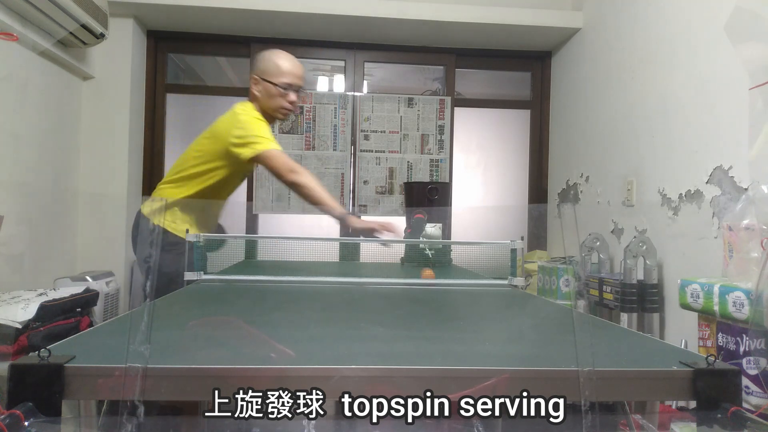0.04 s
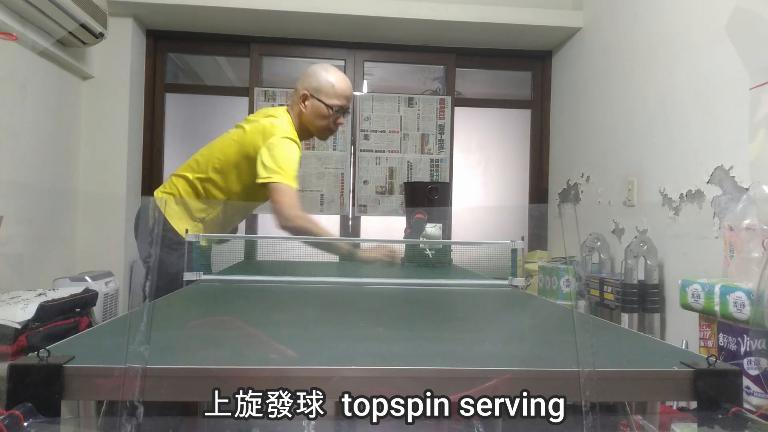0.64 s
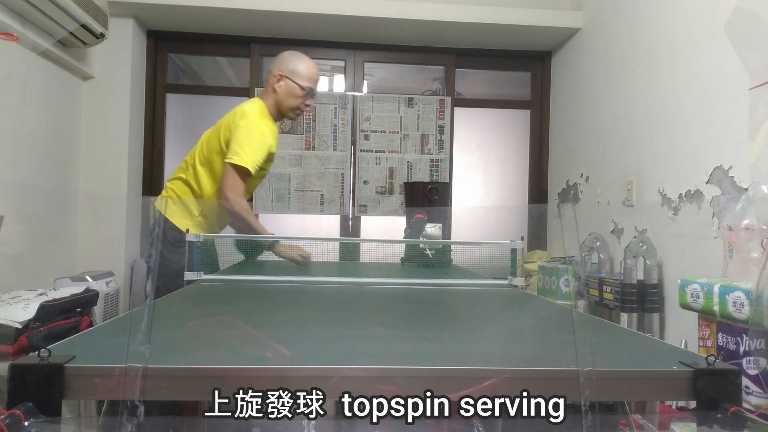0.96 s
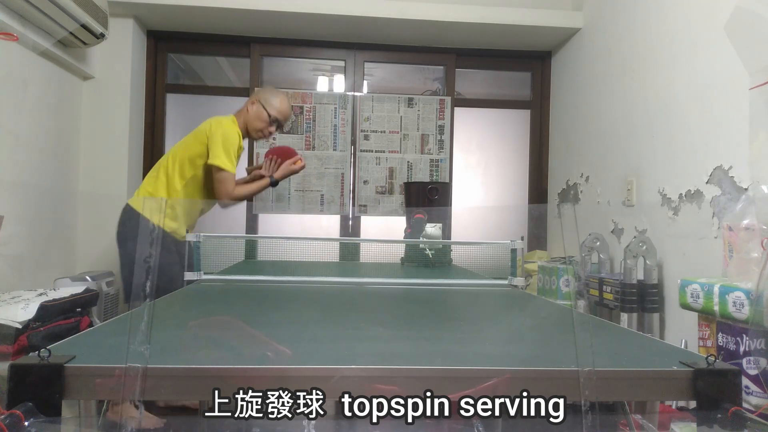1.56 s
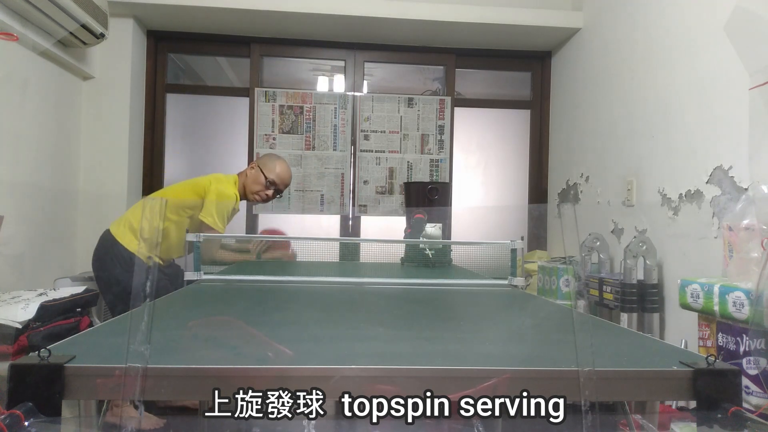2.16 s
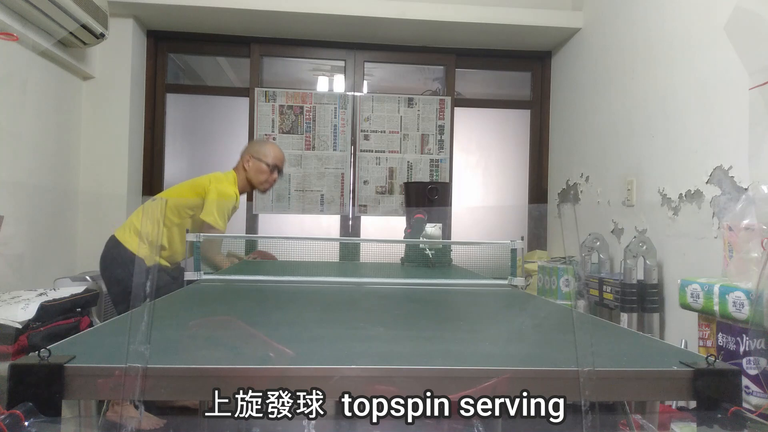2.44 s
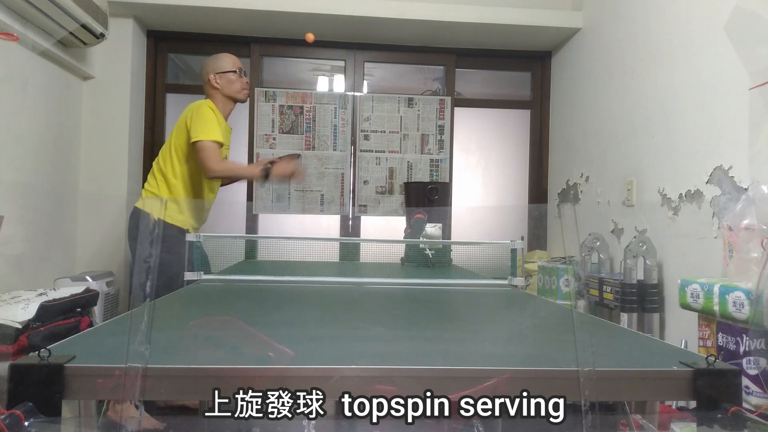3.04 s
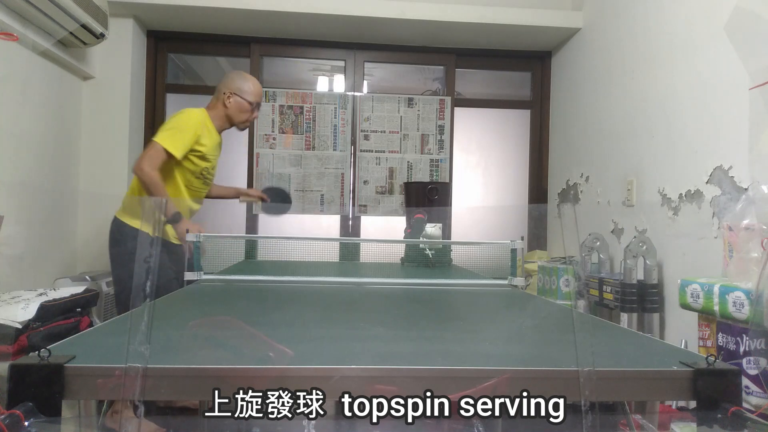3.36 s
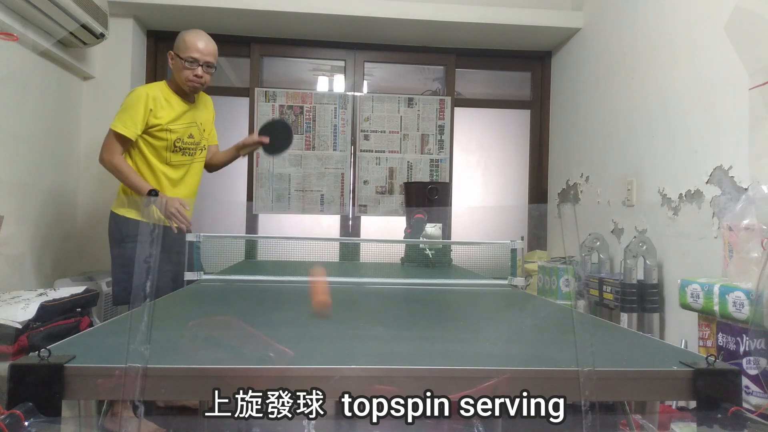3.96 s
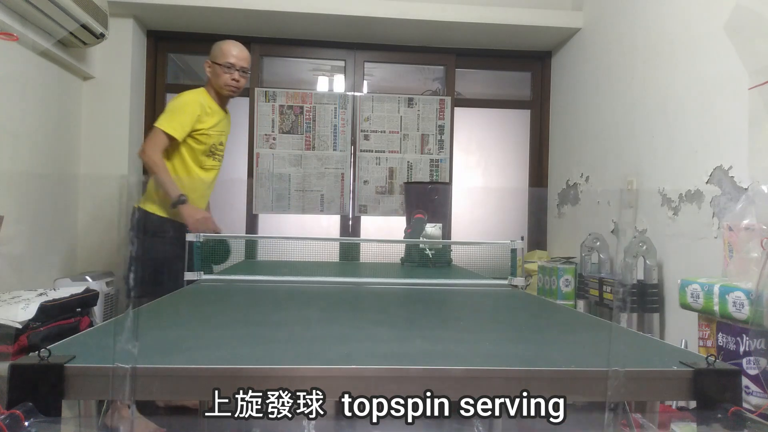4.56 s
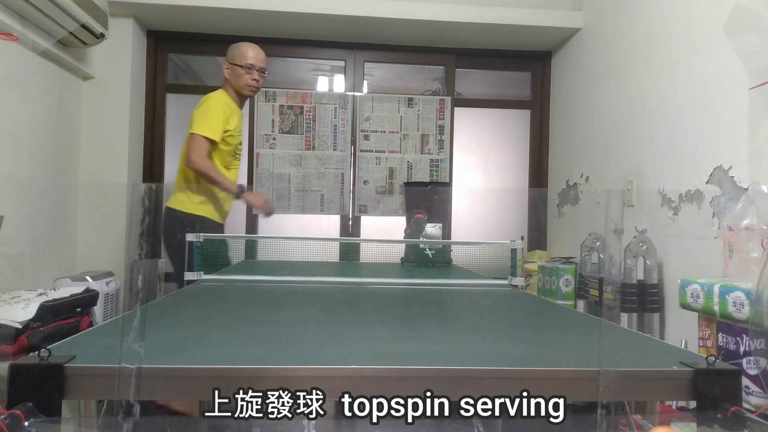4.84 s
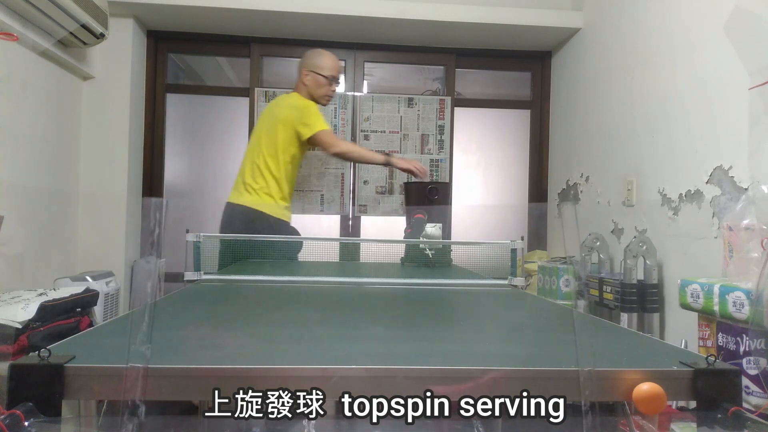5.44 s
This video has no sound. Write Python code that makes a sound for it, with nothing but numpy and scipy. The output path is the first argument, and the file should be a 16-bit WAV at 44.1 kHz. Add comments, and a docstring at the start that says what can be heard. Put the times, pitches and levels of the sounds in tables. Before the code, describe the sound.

Light table tennis bounces indoors, then a foot thud, a paddle hit, two bounces and a close, ringing slap on plastic.

```python
"""Table tennis serve practice

In a small, hard-walled room a ball clicks on the far half of the table and is gathered up. The player
wipes the paddle, tosses, stamps and serves: a hollow pock, two bounces, then a close slap on a plastic
screen that rings on. The ball rolls away with a murmur and taps the table's rim."""
import sys
import numpy as np
from scipy import signal
from scipy.fft import rfft, irfft, next_fast_len
from scipy.io import wavfile
from scipy.ndimage import map_coordinates

SR = 44100
rng = np.random.default_rng(int(sys.argv[2]) if len(sys.argv) > 2 else 0)


def wrap_up_sound(samples):
    """Save the sound to the file named by the first command line argument, as 16-bit audio."""
    columns = np.atleast_2d(samples).T
    # keep every value between -1 and 1, then stretch to whole-number steps
    tamed = np.clip(columns, -1, 1)
    steps = np.round(tamed * 32767).astype(np.int16)
    wavfile.write(sys.argv[1], SR, steps)


N = 246959
AGE = np.arange(SR) / SR  # seconds since a hit
TIME = np.arange(N) / SR  # seconds into the scene

# Ball on table. Each row: start in seconds, then level, shell ring and centre drumming in dB.
BOUNCES = [(-.06, -34, -12, -19), (0.123, -36.5, -22, -40), (0.2699, -38, -20.5, -24),
           (0.3713, -34.5, -19.5, -25), (0.9261, -37.5, -18, -24), (3.6298, -25.5, -13.5, -19.5),
           (4.0159, -27.5, -22, -25)]
# Hand, sole and ball clicks. Each row: start in seconds, level in dB, brightness in dB per octave.
LIGHT_CLICKS = [(1.124, -59.5, 2), (1.199, -64.5, 7), (1.555, -69, -5), (2.918, -65.5, 0),
                (3.154, -54, -3.5), (4.721, -64, 5.5), (5.236, -62.5, 1.5)]
# Hand and cloth. Each row: start in seconds, level in dB, swell in seconds, fade in dB per second.
RUBS = [(1.19, -55.5, 0.069, 115), (1.52, -65.5, .06, 49), (4.4, -66.5, 0.14, 25)]
# Feet on the floor, ball on the screen. Each row: start in seconds, level in dB.
FOOTSTEPS = [(1.2, -46), (2.311, -66), (3.16, -43.5)]
SCREEN_SLAPS = [(4.2611, -26)]
# Ball on paddle and on rim. Each row: start in seconds, level in dB, shell ring in dB.
PADDLE_STROKES = [(3.533, -33, -17)]
RIM_TAPS = [(5.378, -45, -30)]
# The rolling ball's fader ride. Each row: time in seconds, relative level in dB.
ROLL_FADER = [(4.46, -48.5), (4.594, -54.5), (4.602, -50), (4.804, -68), (5.076, -78.5), (5.138, -70),
              (5.16, -83), (5.248, -56.5), (5.36, -70)]

# Tone colours of the noises and struck bodies. Each row: frequency in Hz, relative level in dB.
ROOM_TONE_EQ = [(15, -33), (25, -9), (59, -4.5), (144, -10.5), (164, -15.5), (281, -16.5), (368, -20.5),
                (703, -22), (762, -24), (1080, -24.5), (1530, -28), (1660, -26), (7700, -41.5),
                (12200, -47), (15500, -61.5)]
TABLE_EQ = [(35, -22.5), (70, -4.5), (110, -12), (150, -2), (500, -2.5), (900, 2), (1600, 3), (2200, 7),
            (3000, 8), (4600, 15), (6300, 15), (8200, 17), (9200, 15.5), (11000, 20.5), (15500, 9.5)]
CLICK_EQ = [(100, 1.5), (600, 2), (1300, 2.5), (2500, 0), (4500, -2), (7200, -1), (9500, -19.5),
            (15000, -25.5)]
RUB_EQ = [(710, -43), (1200, -13), (2710, -0.5), (3070, -3.5), (3530, 1), (4890, -2.5), (6650, -1),
          (12500, -31.5), (15000, -35)]
FLOOR_EQ = [(25, -24), (45, -1.5), (62, 6), (110, -21.5), (170, -3.5), (300, -16), (700, -60), (3000, -77)]
PADDLE_EQ = [(60, -54), (400, -19.5), (520, -7), (780, -6), (1080, -2.5), (1450, -6), (1850, -8.5),
             (2500, -20), (3300, -17), (4200, -29), (6200, -24), (8000, -23), (10500, -32), (15500, -39)]
SCREEN_EQ = [(29, -47), (50, -18), (100, -7), (134, -20), (211, -0.5), (256, -4), (513, 0.5), (701, -1),
             (1340, 0), (1440, -11), (1620, 3), (2020, -4), (2170, -6), (6690, -19), (15500, -62.5)]
ROLL_EQ = [(100, -2), (300, -8), (560, -1), (800, -8), (1300, -10.5), (2500, -27.5), (6000, -41),
           (15000, -49)]
RIM_EQ = [(88, -45), (150, -9), (275, -11), (588, -2), (812, -5.5), (982, -7), (1080, -8), (1360, -4.5),
          (1460, -14.5), (2310, -13.5), (2690, -19.5), (6550, -26), (14000, -50)]

# What rings after a hit. Each row: pitch in Hz, relative level in dB, seconds to fade by 60 dB.
BALL_SHELL_MODES = [(8515, -8, 0.025), (10150, -12.5, 0.0073), (10730, -24, 0.0054)]
TABLETOP_MODES = [(140.6, -3, 0.85), (218.1, -2, 0.34), (270, -3, 0.62), (391, -1, 0.16), (502, 5.5, 0.32),
                  (620, -5, 0.6), (890, -4, 0.29)]
TABLETOP_LOWEST_MODE = [(90, 0, 1.0)]
HOLLOW_CLICK_MODES = [(1232, -2, 0.027), (1833, -11, 0.055), (2420, -10, 0.058)]
ROOM_BASS_MODES = [(59.7, 6.5, 0.23), (82.7, -7, 0.71), (139.1, -7, 0.66)]
BLADE_MODES = [(570, 6, 0.097), (1075, -5, 0.046), (1250, -3, 0.054), (3200, -9.5, 0.031)]
SCREEN_MODES = [(134, -13, 0.72), (512, -13, 0.91), (617, -5.5, 0.67), (668, -5.5, 0.81), (695, -2, 0.63),
                (856, -16.5, 0.64), (943, -7.5, 0.77), (1020, -13, 0.93), (1174, -16.5, 0.32),
                (1420, -10.5, 0.81), (1421, -8.5, 0.5), (1550, -2.5, 0.62), (1610, -14.5, 0.78),
                (1690, -1, 0.42), (1750, -6.5, 0.49), (1911, -19, 0.32), (2170, -25.5, 0.72),
                (2520, -10, 0.8), (2767, -20, 0.51), (2966, -24.5, 0.8)]
RAIL_MODES = [(575, -15, 0.57), (988, -8.5, 0.6), (1236, -10, 0.37), (1376, 0, 0.5), (1775, -8, 0.5),
              (1920, -11, 0.59), (2340, -7.5, 0.42), (3042, -11, 0.38)]

# The room's reverb. Each row: frequency in Hz, seconds to fade by 60 dB.
REVERB_TIMES = [(60, 0.72), (150, 0.48), (400, 0.41), (1000, 0.51), (2000, 0.55), (5000, 0.53),
                (8500, 0.49), (11000, 0.45), (15000, 0.2)]


def amp(db):
    """Decibels to gain."""
    return 10 ** (np.asarray(db) / 20)


def unit_energy(x):
    """Scale to energy 1."""
    return x / (np.linalg.norm(x) + 1e-20)


def curve_at(points, hz):
    """Read (Hz, value) points on a log frequency axis."""
    knots_hz, values = np.transpose(points)
    return np.interp(np.log(hz + 1), np.log(knots_hz), values)


def wobble(knots_per_s):
    """A smooth random drift."""
    knots = rng.standard_normal(int(N * knots_per_s / SR) + 4)
    return map_coordinates(knots, [TIME * knots_per_s])


def noise(eq):
    """Coloured noise of rms 1."""
    size = next_fast_len(N)
    gain = amp(curve_at(eq, np.fft.rfftfreq(size, 1 / SR)))
    coloured = irfft(rfft(rng.standard_normal(size)) * gain, size)[:N]
    return coloured / np.sqrt(np.mean(coloured ** 2))


def body(eq, tilt_db=0):
    """A body's dry knock: an impulse shaped by its EQ, the treble tilted by tilt_db per octave."""
    hz = np.fft.rfftfreq(SR, 1 / SR)
    gain = amp(curve_at(eq, hz) + tilt_db * np.log2(1 + hz / 1000))
    cepstrum = irfft(np.log(gain), SR)
    cepstrum[1:SR // 2] *= 2  # minimum phase packs the energy into the attack
    cepstrum[SR // 2 + 1:] = 0
    return unit_energy(irfft(np.exp(rfft(cepstrum)), SR))


def ring(modes, scatter_db=1.0):
    """Damped modes, their balance scattered from hit to hit."""
    out = np.zeros(SR)
    for hz, db, t60 in modes:
        gain = amp(db + scatter_db * rng.standard_normal())
        out += gain * amp(-60 * AGE / t60) * np.sin(2 * np.pi * hz * AGE)
    return unit_energy(out)


def bloom(rise_s):
    """A soft attack that eases up to full level."""
    return 1 - np.exp(-AGE / rise_s)


def in_room(source, direct_db):
    """Direct sound, direct_db against the reverb, then wall echoes that thicken into a diffuse tail."""
    hz, age, spectrum = signal.stft(rng.standard_normal(SR), SR, nperseg=256)
    decay = amp(-60 * age / curve_at(REVERB_TIMES, hz)[:, None])
    tail = signal.istft(spectrum * decay, SR, nperseg=256)[1][:SR]
    density = np.clip((AGE / 0.025) ** 2, 0.08, 1)
    echoes = rng.random(SR) < density
    response = tail * echoes / np.sqrt(density) * bloom(0.002)
    response[0] = amp(direct_db) * np.linalg.norm(response)
    return signal.fftconvolve(source, response)[:SR]


def add(track, start_s, sound):
    """Mix a sound in at its cue."""
    start = round(start_s * SR)
    part = sound[max(-start, 0):N - start]
    track[max(start, 0):][:len(part)] += part


def room_tone():
    """A faint, wavering bed of hush."""
    return amp(-67 + 0.85 * wobble(28)) * noise(ROOM_TONE_EQ)


def table_bounces():
    """Each contact is a lossy half-sine push, shorter and brighter when harder; shell and top ring on."""
    gentle_db, gentle_contact_ms, gentle_tilt_db = -34, 0.652, 0.49
    shortening, brightening = 0.075, 0.054
    out = np.zeros(N)
    for start_s, db, shell_db, drum_db in BOUNCES:
        harder_db = db - gentle_db
        contact_ms = gentle_contact_ms * amp(-shortening * harder_db)
        progress = np.minimum(AGE * 1000 / contact_ms, 1)
        push = np.sin(np.pi * progress) * np.exp(-0.7 * progress)
        table = body(TABLE_EQ, gentle_tilt_db + brightening * harder_db)
        knock = unit_energy(signal.fftconvolve(push, table)[:SR])
        click = knock - amp(shell_db) * ring(BALL_SHELL_MODES)
        tabletop = amp(-14.5) * ring(TABLETOP_MODES)
        drum = amp(drum_db) * ring(TABLETOP_LOWEST_MODE)  # driven by hits near the middle
        board = amp(38) * (tabletop + drum) * bloom(0.032)
        add(out, start_s, amp(db) * (in_room(click, direct_db=-18.5) + board))
    return out


def light_clicks():
    """Hand, sole and ball make small ticks with a hollow ring."""
    out = np.zeros(N)
    for start_s, db, tilt_db in LIGHT_CLICKS:
        tick = in_room(body(CLICK_EQ, tilt_db), direct_db=-13.5)
        hollow = amp(-7.5) * in_room(ring(HOLLOW_CLICK_MODES), direct_db=-2.5)
        add(out, start_s, amp(db) * (tick + hollow))
    return out


def rubbing():
    """A hand slides over table and paddle and clothes shift: uneven swishes that swell and die away."""
    envelope = np.zeros(N)
    for start_s, db, swell_s, fade_db_per_s in RUBS:
        age = TIME - start_s
        swell = np.clip(age / swell_s, 0, 1)
        envelope += swell * amp(db - fade_db_per_s * np.maximum(age - swell_s, 0))
    return envelope * amp(1.5 * wobble(45)) * noise(RUB_EQ)


def footsteps():
    """Soft thuds on the floorboards set the room's bass booming."""
    out = np.zeros(N)
    for start_s, db in FOOTSTEPS:
        boom = amp(36) * ring(ROOM_BASS_MODES) * bloom(0.01)
        thud = amp(-5) * in_room(body(FLOOR_EQ), direct_db=-40)
        add(out, start_s, amp(db) * (thud + boom))
    return out


def paddle_strokes():
    """The rubber-faced blade gives a hollow, pitched pock with no bass."""
    out = np.zeros(N)
    for start_s, db, shell_db in PADDLE_STROKES:
        blade = unit_energy(body(PADDLE_EQ) + amp(-8.5) * ring(BLADE_MODES))
        pock = blade + amp(shell_db) * ring(BALL_SHELL_MODES)
        add(out, start_s, amp(db) * in_room(pock, direct_db=-11.5))
    return out


def screen_slaps():
    """Up close, the plastic sheet gives way in one swing, chatters for a moment and goes on ringing."""
    swing_hz, swing_t60_s = 560, 0.0096
    sheet = body(SCREEN_EQ)
    out = np.zeros(N)
    for start_s, db in SCREEN_SLAPS:
        swing = -amp(26.5) * ring([(swing_hz, 0, swing_t60_s)], scatter_db=0)
        burst = rng.standard_normal(SR) * np.exp(-AGE / 0.0045) * (AGE > 0.0008)
        chatter = amp(28.5) * unit_energy(signal.fftconvolve(burst, sheet)[:SR])
        ringing = amp(24) * ring(SCREEN_MODES) * bloom(0.029)
        reverb = amp(-1.5) * in_room(sheet, direct_db=-21)
        add(out, start_s, amp(db) * (swing + chatter + ringing + reverb))
    return out


def ball_roll():
    """Dropping off the screen, the ball rolls and murmurs unevenly through the tabletop."""
    start_s, swell_s, trim_db = 4.3, 0.071, 0.5
    fade_in = np.clip((TIME - start_s) / swell_s, 0, 1)
    level_db = np.interp(TIME, *np.transpose(ROLL_FADER)) + trim_db
    return fade_in * amp(level_db + 1.4 * wobble(30)) * noise(ROLL_EQ)


def rim_taps():
    """The slow ball knocks the rim and sets its rail ringing."""
    out = np.zeros(N)
    for start_s, db, shell_db in RIM_TAPS:
        knock = body(RIM_EQ) + amp(shell_db) * ring(BALL_SHELL_MODES)
        rail = amp(28.5) * ring(RAIL_MODES) * bloom(0.025)
        add(out, start_s, amp(db) * (in_room(knock, direct_db=-13) + rail))
    return out


def scene():
    """All layers in one mono mix."""
    mix = room_tone() + table_bounces() + light_clicks() + rubbing() + footsteps()
    mix += paddle_strokes() + screen_slaps() + ball_roll() + rim_taps()
    return mix[None]


def record(dry):
    """Master EQ: thin the deepest bass and cut off the very top."""
    low_cut_hz, top_hz = 40, 15750
    low_cut = signal.butter(4, low_cut_hz, "highpass", fs=SR, output="sos")
    thinned = signal.sosfilt(low_cut, dry)
    size = next_fast_len(N + SR // 2)
    passband = np.fft.rfftfreq(size, 1 / SR) < top_hz
    return irfft(rfft(thinned, size) * passband, size)[:, :N]


dry = scene()
out = record(dry)
wrap_up_sound(out)
```